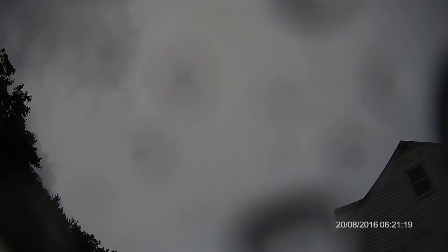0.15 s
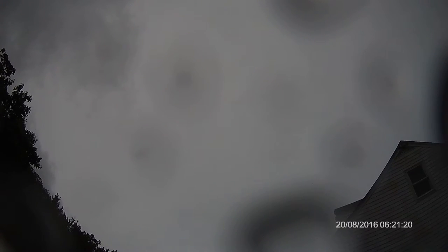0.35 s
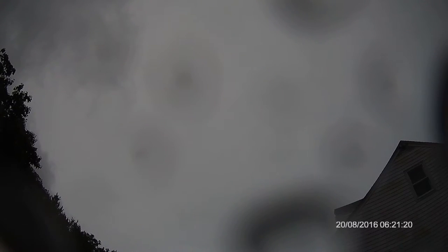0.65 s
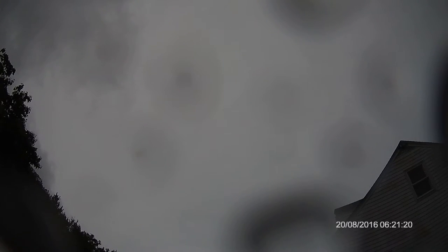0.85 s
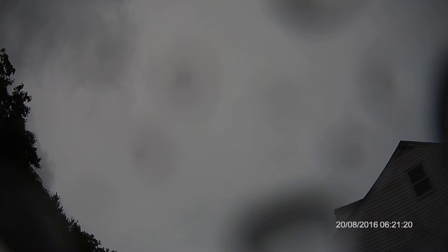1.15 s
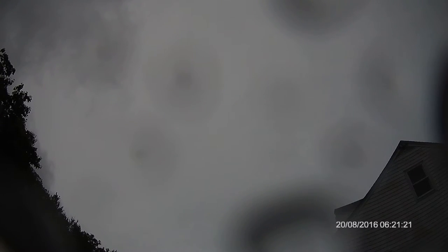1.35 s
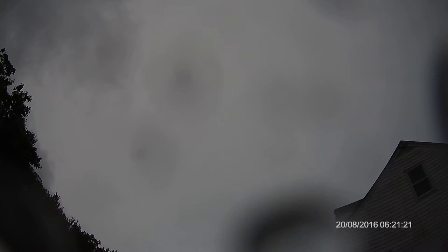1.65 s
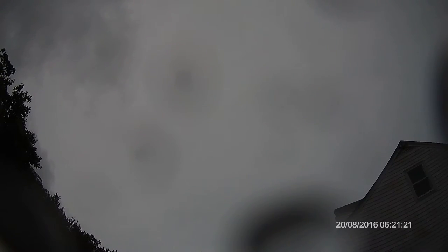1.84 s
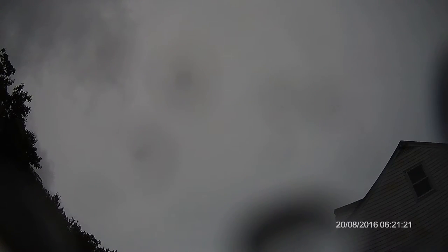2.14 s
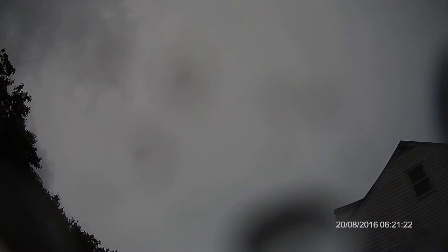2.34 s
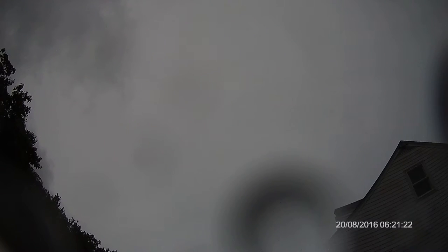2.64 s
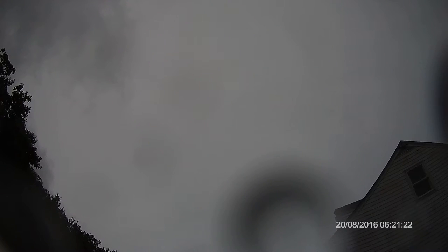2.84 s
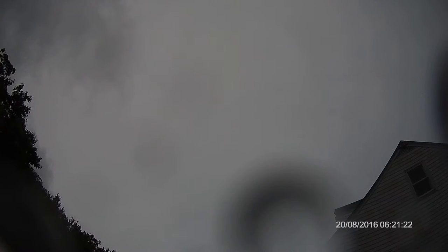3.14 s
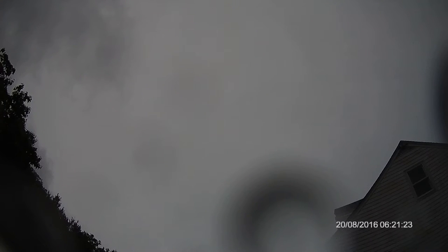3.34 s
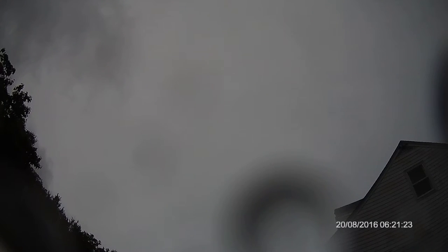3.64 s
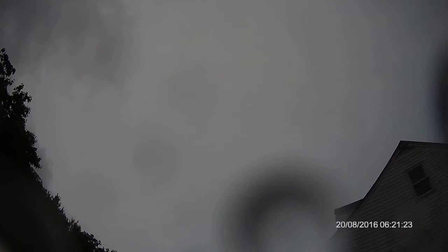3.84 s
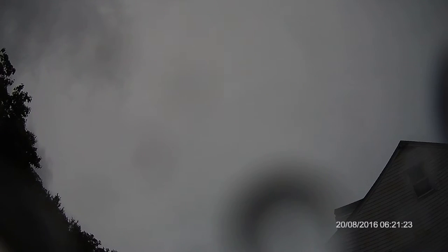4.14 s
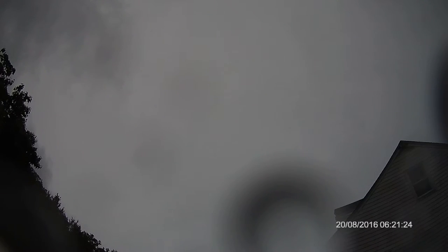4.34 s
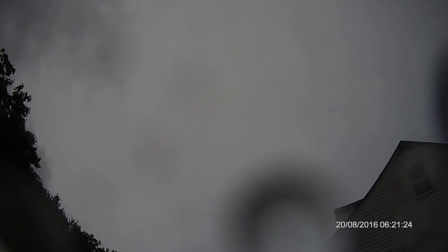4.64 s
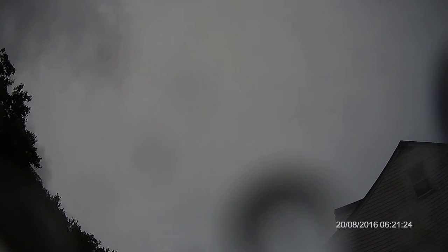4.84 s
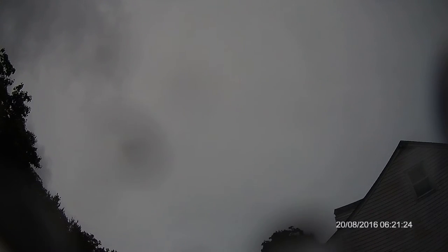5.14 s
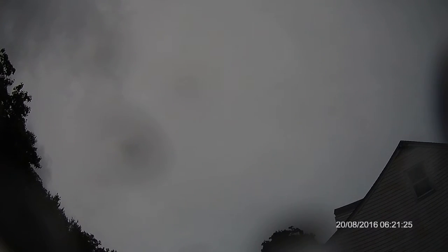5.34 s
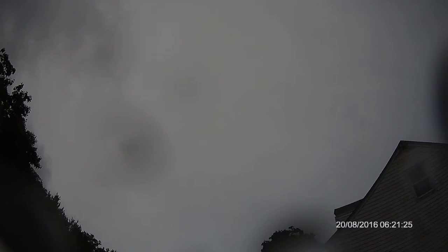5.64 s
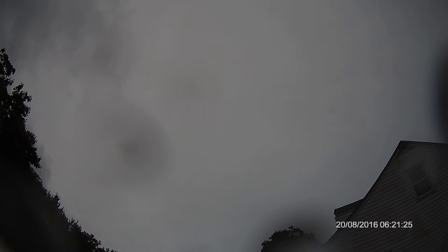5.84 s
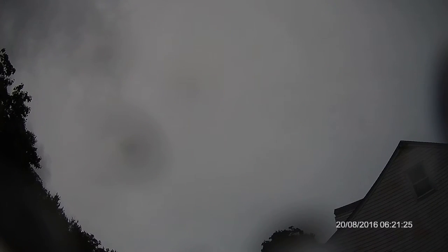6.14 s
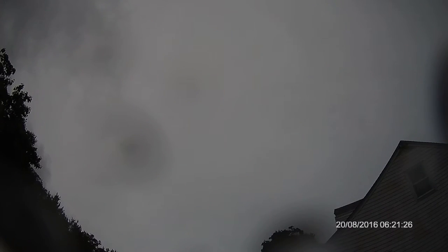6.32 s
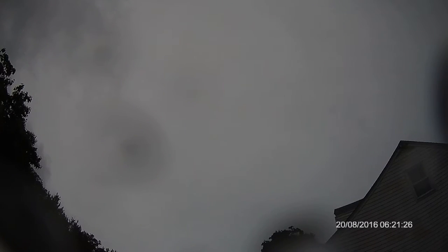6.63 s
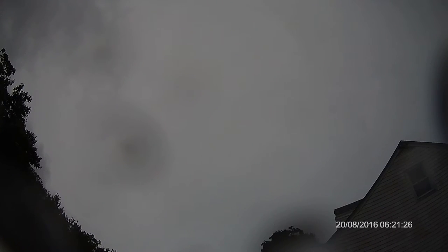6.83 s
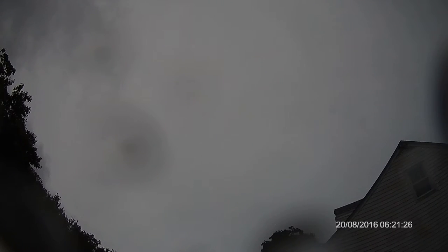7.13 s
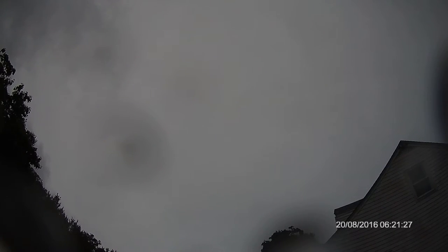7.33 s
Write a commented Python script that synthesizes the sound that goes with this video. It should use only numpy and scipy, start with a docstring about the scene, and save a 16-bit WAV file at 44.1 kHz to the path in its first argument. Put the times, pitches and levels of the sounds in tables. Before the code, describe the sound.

Raindrops tick and knock unevenly on a plastic housing, right next to the microphone sealed inside. Behind them, the outdoor shower comes through the walls dull and boxy, with a faint electronic hiss and fizz. Heavy drips land nearby with low thuds, and two sharp, loud hits stand out a little after halfway. The rain slowly lets up as the scattered tapping continues.

```python
"""Rain on a small camera sealed in a plastic case, outdoors. From the start the shower comes through
the walls as a muffled wash, over the camera's own faint hiss, buzz and fizz. Drops strike the case and
ring its walls; from 0.8 to 5.7 s heavy drips thud close by. The two hardest drops hit at 4.2 and 4.4 s,
and the limiter ducks after each. The shower slowly lets up while the taps go on to the end."""
import sys
import numpy as np
from scipy import signal
from scipy.fft import rfft, irfft
from scipy.io import wavfile

SR = 44100
rng = np.random.default_rng(int(sys.argv[2]) if len(sys.argv) > 2 else 0)


def put_to_file(sound):
    """Save the sound as 16-bit audio at rate SR, in the file named by the first command-line argument."""
    columns = np.atleast_2d(sound).T  # one column per channel
    safe = np.clip(columns, -1, 1)
    whole_steps = np.round(safe * 32767)
    wavfile.write(sys.argv[1], SR, whole_steps.astype(np.int16))


N = 329868
TIME_S = np.arange(N) / SR
FREQS_HZ = np.fft.rfftfreq(N, 1 / SR)
EDGE_HZ = 15400  # upper band limit


def amp(db):
    """Decibels to gain."""
    return 10 ** (np.asarray(db) / 20)


def unit(x):
    """Scale to rms 1."""
    return x / np.sqrt(np.mean(x ** 2) + 1e-20)


def blow(x, db):
    """Give a short sound the energy of 4 ms at this level."""
    return amp(db) * x / np.sqrt(np.sum(x ** 2) / (SR * .004))


def add(mix, start_s, sound):
    """Mix a sound in at start_s."""
    part = mix[max(round(start_s * SR), 0):][:len(sound)]
    part += sound[:len(part)]


def humps(table, hz):
    """Gain of a set of steep-sided resonances."""
    return np.sqrt(sum(amp(db) ** 2 / (1 + 2 * ((hz - f) / width) ** 2) ** 3 for f, width, db in table))


def noise(spectrum):
    """Shaped noise, rms 1."""
    hz, db = np.transpose(spectrum)
    gain = amp(np.interp(np.log(FREQS_HZ + 1), np.log(hz), db))
    return unit(irfft(rfft(rng.standard_normal(N)) * gain, N))


def wander(cutoff_hz):
    """Slow random motion, rms 1."""
    gain = np.exp(-(FREQS_HZ / cutoff_hz) ** 2) * (FREQS_HZ > 0)
    return unit(irfft(rfft(rng.standard_normal(N)) * gain, N))


def circuits(hiss_db=-54.1, buzz_db=-69, frame_hz=59.94,
             burst_db=-63.5, bursts_per_s=6, burst_s=.048, spell_db=-55.7):
    """Amplifier hiss, thin buzz at the frame rate, and fizz that switches on and off."""
    hiss_spectrum = [(20, 6), (900, 12), (1900, 11), (2600, 8), (3500, 5.5), (3900, 7), (4400, 3.5),
                     (6500, 0), (8600, -.5), (9300, 1), (11500, -2.5), (15000, -4)]  # amplifier noise: f/Hz, relative density/dB
    fizz_spectrum = [(20, -40), (7000, -22), (8700, -14), (9200, -2), (10900, 0), (11250, -15), (12300, -8),
                     (13300, -11), (14200, -22)]  # circuit fizz: f/Hz, relative density/dB
    fizz_spells = [(0, .085), (2.55, 2.6), (2.63, 3.025), (3.09, 3.245)]  # louder spells of fizz: start/s, end/s
    whine_peaks = [(7890, 130, 0), (9230, 650, -3), (12250, 650, -7.5)]  # circuit whine: f/Hz, width/Hz, relative level/dB
    harmonics_hz = np.arange(1, EDGE_HZ // frame_hz) * frame_hz
    phasors = np.exp(2j * np.pi * rng.random(len(harmonics_hz)))
    comb = np.zeros(len(FREQS_HZ), complex)
    comb[np.round(harmonics_hz * N / SR).astype(int)] = humps(whine_peaks, harmonics_hz) * phasors
    starts_s = (np.arange(60) + rng.uniform(0, .6, 60)) / bursts_per_s
    in_burst = np.any([(TIME_S > s) & (TIME_S < s + burst_s) for s in starts_s], 0)
    in_spell = np.any([(TIME_S > start) & (TIME_S < end) for start, end in fizz_spells], 0)
    fizz = np.maximum(amp(burst_db) * in_burst, amp(spell_db) * in_spell) * noise(fizz_spectrum)
    return amp(hiss_db) * noise(hiss_spectrum) + amp(buzz_db) * unit(irfft(comb, N)) + fizz


def through_walls(x, size=8192):
    """Outside sound enters through the case resonances: causal filter, unit energy."""
    resonances = [(55, 50, -17), (118, 18, -7.5), (141, 30, -.5), (200, 45, -4.5), (248, 55, 1.5),
                  (312, 75, -2), (385, 75, -8), (505, 120, -9), (585, 80, -12), (745, 90, -7),
                  (820, 50, -11.5), (1030, 60, -19), (1135, 80, -13), (1270, 130, -10), (1450, 130, -15.5),
                  (1585, 110, -14), (1745, 120, -19.5)]  # wall transmission: f/Hz, width/Hz, relative level/dB
    log_gain = np.log(humps(resonances, abs(np.fft.fftfreq(size, 1 / SR))) + 1e-5)
    response = np.fft.ifft(np.exp(np.conj(signal.hilbert(log_gain)))).real[:size // 2]
    return signal.oaconvolve(x, response / np.linalg.norm(response))[:N]


def shower_db(base_db=-32, easing_db_per_s=.48, lull_half_s=.15):
    """Level trend of the rain: slow easing, a few short lulls."""
    lulls = [(0, 3), (1.12, 2), (3.25, 2), (5.52, 2), (6.38, 3), (7.15, 1.5)]  # the rain slackens: t/s, depth/dB
    dips_db = sum(db * np.exp(-((TIME_S - s) / lull_half_s) ** 2) for s, db in lulls)
    return base_db - easing_db_per_s * TIME_S - dips_db


def rain(drops_per_s=700, spread_db=3.1, split_hz=600, low_db=1.3, high_db=.2,
         flutter_db=1, clump_db=1.4):
    """Countless drops on ground and roofs, heard through the plastic."""
    sizes = amp(spread_db * np.minimum(rng.exponential(1, N), 5)) * rng.choice([-1, 1], N)
    near = unit(sizes * (rng.random(N) < drops_per_s / SR))
    far = rng.standard_normal(N)
    wash = through_walls(unit(near + far))
    low = signal.sosfiltfilt(signal.butter(2, split_hz, fs=SR, output="sos"), wash)
    gain = amp(shower_db() + flutter_db * wander(14))
    low_gain = amp(low_db + clump_db * wander(8))  # big drops come in clumps
    return gain * (low_gain * low + amp(high_db) * (wash - low))


def drips(thud_hz=275, thud_peak_s=.0042, body_hz=145, body_db=-14, body_peak_s=.009, spray_t60_s=.28):
    """A heavy drip thuds with a deeper after-swing, then its spray falls back."""
    landings = [(.767, -24, -23), (.813, -14, -31), (.862, -19, -31), (.943, -18, -38), (1.881, -20, -40),
                (2.500, -18, -37), (3.555, -17, -38), (4.141, -15, -31), (5.095, -19, -38),
                (5.367, -14.5, -30), (5.670, -13.5, -30)]  # drips close by: t/s, thud/dB, spray/dB
    t = np.arange(SR // 4) / SR
    thuds, spray = np.zeros(N), np.zeros(N)
    for start_s, thud_db, spray_db in landings:
        for hz, db, peak_s in (thud_hz, thud_db, thud_peak_s), (body_hz, thud_db + body_db, body_peak_s):
            swing = np.sin(2 * np.pi * hz * rng.uniform(.9, 1.1) * t)
            envelope = (t / peak_s * np.exp(1 - t / peak_s)) ** 2
            add(thuds, start_s, amp(db) * swing * envelope)
        add(spray, start_s, amp(spray_db - 60 * t / spray_t60_s) * rng.standard_normal(len(t)))
    return thuds + through_walls(spray)


def tap(ring_db, knock_db, ping_db, snap_db, spot_hz, tilt_db_per_oct,
        spot_width_hz=230, vary_db=2.2, dull_from_db=27, splash_db=-8, splash_t60_s=.009,
        sharp_s=.0005, soften_s_per_db=.000032, contact_s=.00012):
    """One drop rings the modes of the case; wall modes near spot_hz ring most."""
    # case modes: f/Hz, level/dB, t60/s, family (0 wall ring, 1 shell knock, 2 corner ping, 3 contact snap)
    case_modes = [(1120, -13.5, .038, 0), (1276, 0, .034, 0), (1415, -11, .042, 0), (1505, -.5, .032, 0),
                  (1615, -11, .03, 0), (2430, -8.5, .028, 0), (4600, -23, .02, 0), (420, -3, .02, 1),
                  (520, -1, .018, 1), (680, -3, .012, 1), (780, -3, .016, 1), (2010, 0, .016, 2),
                  (2420, -8, .009, 2), (2780, -7.5, .005, 3), (3230, -5, .009, 3), (3700, -3, .005, 3),
                  (4150, -4, .005, 3), (4650, -2, .005, 3), (5200, 0, .004, 3), (5700, -5.5, .005, 3),
                  (7600, -8, .003, 3), (9950, -6, .003, 3), (14000, -10.5, .002, 3)]
    hz, db, t60_s, family = np.transpose(case_modes)
    wall, snap = family == 0, family == 3
    t = np.arange(SR // 16) / SR
    db = db + vary_db * rng.standard_normal(len(hz)) * np.where(wall, .3, 1)
    db -= wall * np.minimum(6 * ((hz - spot_hz) / spot_width_hz) ** 2, 8)
    db += snap * tilt_db_per_oct * np.log2(hz / spot_hz)
    # a soft landing pushes the wall for longer and spares its overtones
    softness_db = max(ring_db - snap_db, 0)
    push_s = sharp_s + soften_s_per_db * softness_db
    db -= wall * (hz > 2000) * max(softness_db - dull_from_db, 0)
    hz = hz * (1 + np.where(wall, .004, .015) * rng.standard_normal(len(hz)))  # clinging water detunes
    phase = np.where(wall, -hz * push_s, rng.random(len(hz)))  # wall modes start in step, then beat
    rise_s = np.where(wall, push_s, contact_s + .5 * (push_s - sharp_s))
    modes = np.cos(2 * np.pi * (hz[:, None] * t + phase[:, None]))
    modes *= amp(db[:, None] - 60 * t / t60_s[:, None])
    modes *= 1 - np.exp(-(t / rise_s[:, None]) ** 2)
    family_db = ring_db, knock_db, ping_db, snap_db
    shell = sum(blow(modes[family == k].sum(0), level) for k, level in enumerate(family_db))
    splash_band = signal.butter(1, [2200, 6000], "band", fs=SR, output="sos")
    splash = signal.sosfilt(splash_band, rng.standard_normal(len(t))) * amp(-60 * t / splash_t60_s)
    return shell + blow(splash, snap_db + splash_db)


def droplets(count=45, spread_db=3):
    """Fine droplets tick faintly on the case at random times."""
    out = np.zeros(N)
    for when, size, spot in rng.random((count, 3)):
        tick = tap(ring_db=-37, knock_db=-45, ping_db=-60, snap_db=-71,
                   spot_hz=1200 + 400 * spot, tilt_db_per_oct=-4)
        add(out, when * N / SR, amp(spread_db * (2 * size - 1)) * tick)
    return out


def landing(strength_db, softness_db, place_db):
    """Water cushions a drop and takes away its snap; a corner pings, mid-wall knocks."""
    corner_db, middle_db = max(place_db, 0), max(-place_db, 0)
    return tap(ring_db=strength_db + .5,
               knock_db=strength_db - 3.3 - .48 * softness_db + middle_db,
               ping_db=strength_db - 3.5 - .7 * softness_db + corner_db,
               snap_db=strength_db - 1 - softness_db,
               spot_hz=1280 + 2.9 * softness_db,  # softer landing, higher wall ring
               tilt_db_per_oct=2.6 - .2 * softness_db - .4 * corner_db)


def drops(highpass_hz=260):
    """Distinct drops strike the case; so small a shell gives no deep bass."""
    # hits: t/s, strength/dB, softness/dB (0 bare plastic, 40 standing water), place/dB (+ corner, - mid-wall)
    hits = [(.3874, -24, 11, -9), (.4554, -36, 1, -3), (.5796, -30, 10, 2), (.6352, -15.5, 19.5, 19),
            (.7329, -41, 7, 2), (.8308, -15, 12, -5), (.8833, -38, 11, 14), (1.0007, -26, 23, 0),
            (1.2556, -27, 25, 0), (1.2628, -26, 13, 2), (1.2968, -35, 10, 0), (1.4773, -19, 0, -1),
            (1.9129, -36, -4, 0), (2.1522, -30, 5, 4), (2.2354, -32, 10, 4), (2.2654, -26, 26, -6),
            (2.4171, -28, -3, 0), (2.4322, -39, -3, 0), (2.5513, -16.5, 11.5, 1), (2.728, -26.5, 21, -4),
            (2.9011, -31, 2, 1), (3.1653, -30, 29, 0), (3.4141, -47, -3, 3), (3.6628, -18, 7.5, 6),
            (4.0144, -18, 12, -7), (4.0945, -12, 16.5, 6.5), (4.222, 2.3, 29.5, -2), (4.3579, 2.3, 30, -2),
            (4.4058, -38, 3, 8), (4.491, -30, 14, 0), (4.6227, -25, 2, 2), (4.7319, -38, 6, 9),
            (4.8993, -33, 2, -4), (5.0524, -20.5, 0, 2.5), (5.2603, -16, 13, -6), (5.557, -31, 26, 0),
            (6.099, -42, 3, 11), (6.6935, -30, 13, 11), (6.7339, -15, 40, 0), (6.8608, -20, 30, 4),
            (7.2284, -17.5, 42, 0), (7.3941, -31, 10, 9), (7.3961, -23, 10, -5), (7.4041, -29, 15, 0),
            (7.411, -33, 17, 0)]
    out = np.zeros(N)
    for start_s, strength_db, softness_db, place_db in hits:
        add(out, start_s, landing(strength_db, softness_db, place_db))
    return signal.sosfilt(signal.butter(2, highpass_hz, "high", fs=SR, output="sos"), out)


def scene():
    """Water sounds inside the case plus circuit noise, mono."""
    return (rain() + drips() + drops() + droplets() + circuits())[None]


def record(dry, threshold_db=-2.2, recover_db_per_s=98, attack_s=.0008):
    """A limiter clamps a little late and recovers; what slips past is clipped; then the band limit."""
    over_db = np.maximum(20 * np.log10(abs(dry[0]) + 1e-9) - threshold_db, 0)
    recovery_db = TIME_S * recover_db_per_s
    held_db = np.maximum.accumulate(over_db + recovery_db) - recovery_db
    pole = np.exp(-1 / (attack_s * SR))
    duck_db = signal.lfilter([1 - pole], [1, -pole], held_db)
    clipped = np.clip(dry * amp(-duck_db), -1, 1)
    lowpass = signal.firwin(401, EDGE_HZ, window=("kaiser", 8), fs=SR)
    return signal.oaconvolve(clipped, lowpass[None], "same")


dry = scene()
out = record(dry)
put_to_file(out)
```